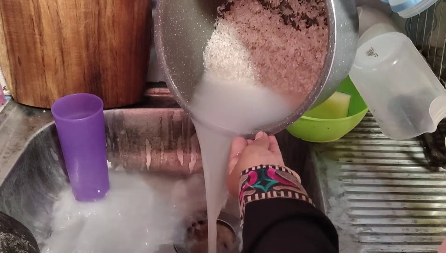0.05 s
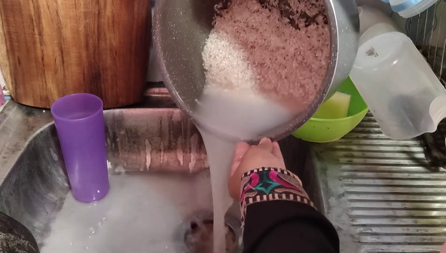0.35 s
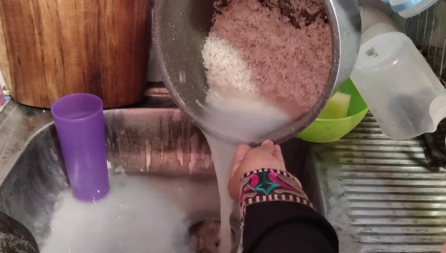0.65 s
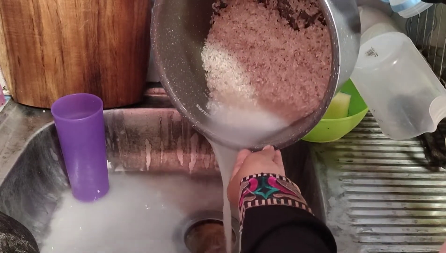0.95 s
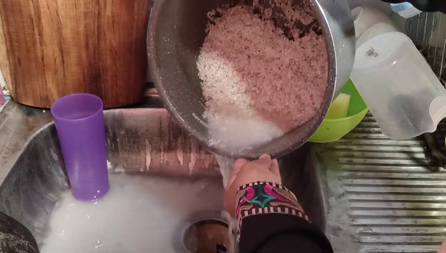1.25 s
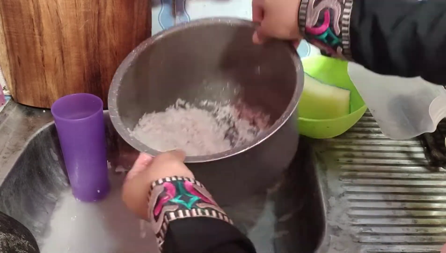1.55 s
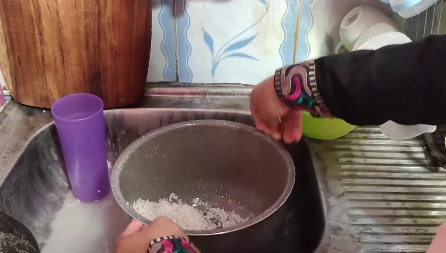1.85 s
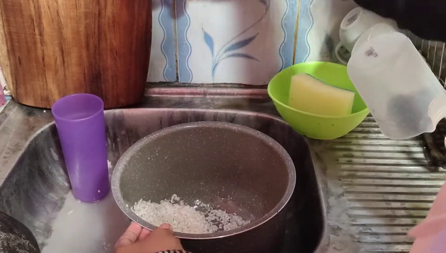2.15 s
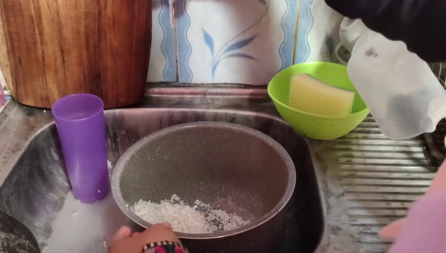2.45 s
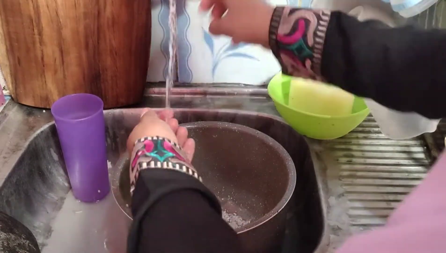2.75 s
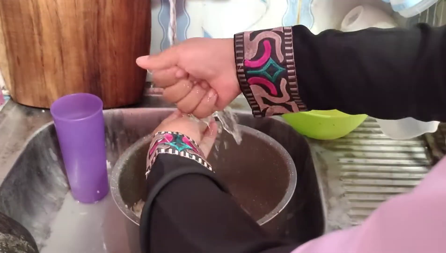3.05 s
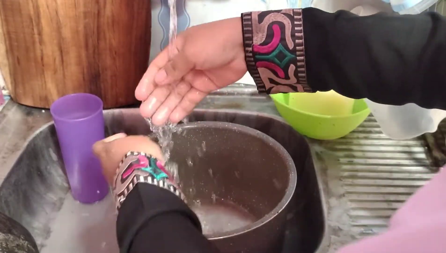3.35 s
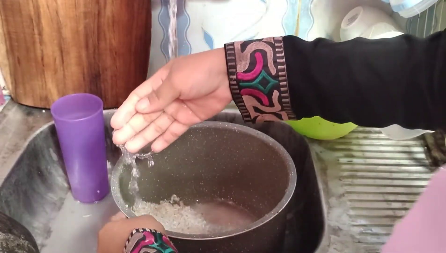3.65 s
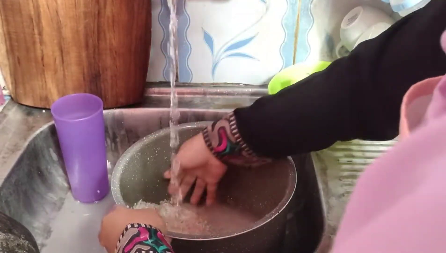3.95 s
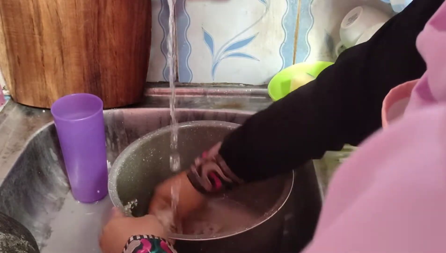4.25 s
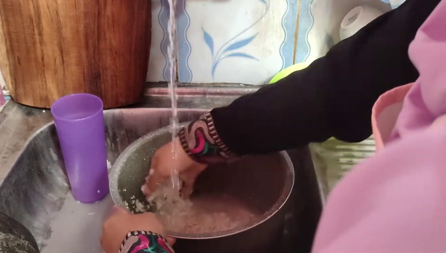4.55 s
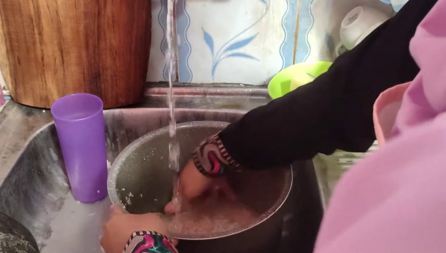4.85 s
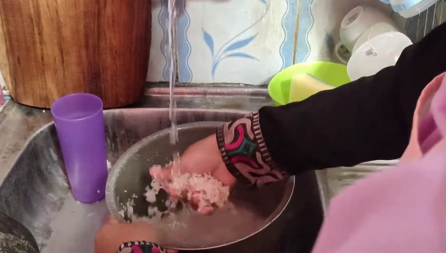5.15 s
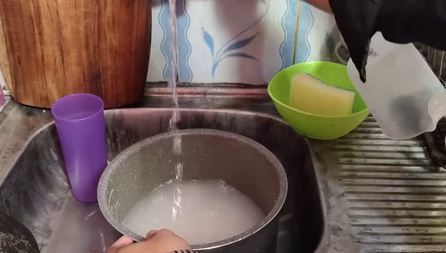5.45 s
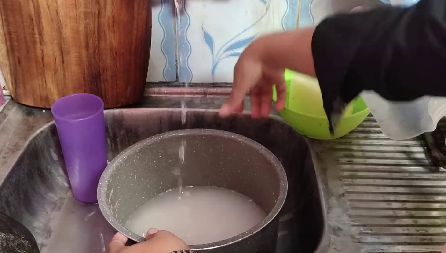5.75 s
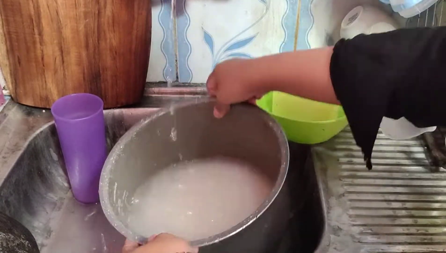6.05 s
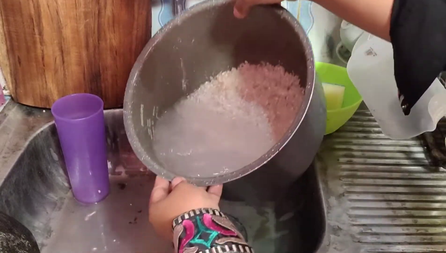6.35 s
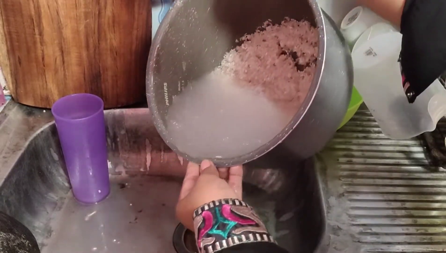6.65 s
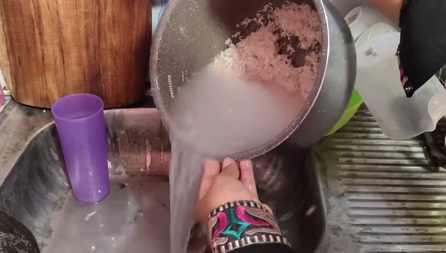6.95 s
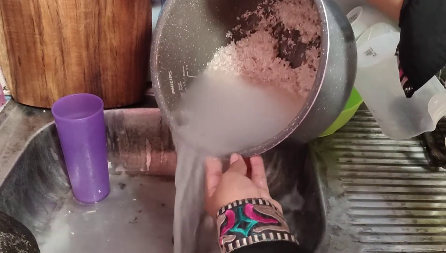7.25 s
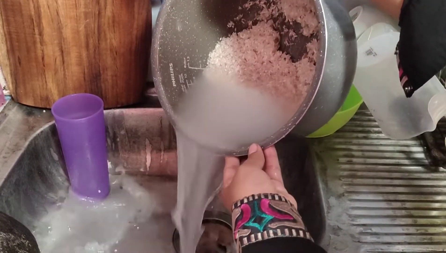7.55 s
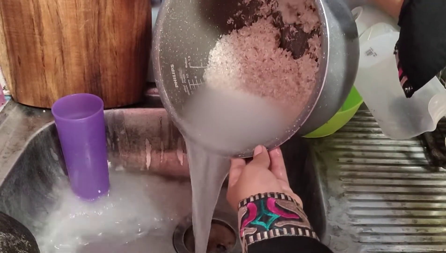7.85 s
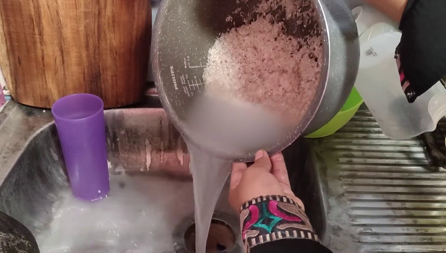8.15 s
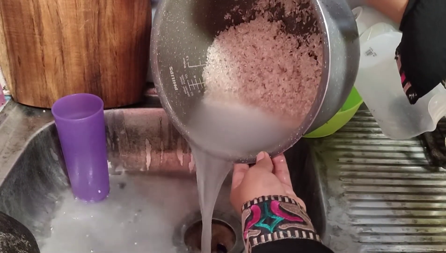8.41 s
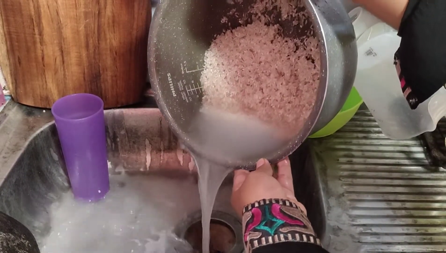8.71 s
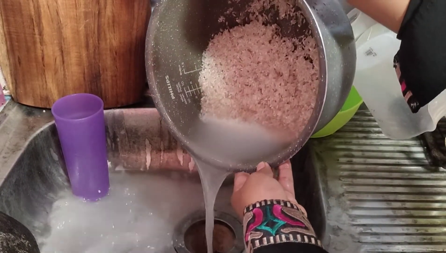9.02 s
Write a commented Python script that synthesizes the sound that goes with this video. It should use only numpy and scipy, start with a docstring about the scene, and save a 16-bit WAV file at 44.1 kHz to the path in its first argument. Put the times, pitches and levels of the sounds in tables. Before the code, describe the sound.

Water splashes and gurgles in a kitchen sink as rice is rinsed, with a metal pot thumping and a tap squeaking open.

```python
"""Rinsing rice in a metal pot

Cloudy water pours into a steel sink in a small kitchen, and the pot is set down with a clatter.
The tap squeaks open; its stream sprays, drums and traps ringing bubbles as a hand swishes the rice.
The pot fills, scrapes out of the sink with a ring of metal, and is drained again."""
import sys
import numpy as np
from scipy import signal
from scipy.fft import rfft, irfft, next_fast_len
from scipy.io import wavfile
from scipy.ndimage import uniform_filter1d

SR = 44100
rng = np.random.default_rng(int(sys.argv[2]) if len(sys.argv) > 2 else 0)


def wav_record(signal):
    """Record a signal, one row per channel, as 16-bit PCM in the file named by sys.argv[1]."""
    frames = np.transpose(np.atleast_2d(signal))
    bounded = np.clip(frames, -1, 1)
    # unit amplitude maps onto the largest positive 16-bit level
    quanta = np.round(bounded * 32767).astype(np.int16)
    wavfile.write(sys.argv[1], SR, quanta)


N = 404838
TIME = np.arange(N) / SR
TOP_HZ = 15700


# Cloudy water running over the rim. Each row: time in seconds, flow in dB.
FIRST_POUR = [(0.03, -43.5), (0.75, -45.5), (0.95, -51), (1.25, -61), (1.42, -55.5)]
SECOND_POUR = [(7.0, -53), (7.35, -38.5), (7.46, -46), (7.58, -35.5), (7.95, -46.5), (8.2, -47),
               (8.46, -45.5), (8.7, -54), (8.8, -46), (8.95, -57.5), (9.18, -58)]
# Steady streams: the last water draining, then the tap on the palm, the rice and the open pool.
# Each row: start and end in seconds, levels in dB of spray, bubbles, gurgle and drumming, hollow's name.
STREAMS = [(1.48, 2.51, -94, -71, -73, -59, "drain"), (2.763, 3.98, -58.5, -59, -67.5, -67, "hand"),
           (4.128, 5.187, -49.5, -48, -54, -52, "hand"), (5.35, 6.018, -48, -43.5, -41.5, -44.5, "pot")]
# The hand presses the pot against the sink floor. Each row: time in seconds, level in dB.
NUDGES = [(3.35, -52), (4.29, -49), (4.45, -47), (4.56, -52), (4.83, -44), (5.15, -38)]

def water():
    """A pour ends and drains away, the tap runs while the hand stirs, and a second pour follows."""
    spray, bubbles, drumming, gurgles = water_layers()
    in_sink = spray, bubbles, gurgles["drain"], drumming
    out = pour(FIRST_POUR, in_sink, gush_db=1.5) + pour(SECOND_POUR, in_sink, gush_db=13.5)
    for start, end, *levels, hollow in STREAMS:
        layers = spray, bubbles, gurgles[hollow], drumming
        stream = sum(gain_of(db) * layer for db, layer in zip(levels, layers))
        out += running(start, end, fade_in_s=0.078, fade_out_s=0.34) * stream
    nudges = drumming * sum(gain_of(db) * hump(middle, length=0.088) for middle, db in NUDGES)
    return out + sloshes(spray, bubbles) + nudges


# How spray, bubbles, gurgle and drumming follow a pour.
# Each row: level in dB at the usual flow, dB gained for each extra dB of flow.
POUR_LAYERS = [(-49.5, 0.8), (-48, 0.63), (-54.5, 0.55), (-53, 0.2)]

def pour(flow, layers, gush_db, gush_s=0.69, usual_flow_db=-46.5):
    """The first gush hits bare steel, so it gurgles and drums louder until a pool cushions it."""
    times, flow_db = np.transpose(flow)
    excess_db = np.interp(TIME, times, flow_db) - usual_flow_db
    gush = gush_db * np.exp(-np.maximum(TIME - times[0], 0) / gush_s)
    sound = sum(gain_of(db + slope * excess_db + boost) * layer
                for (db, slope), boost, layer in zip(POUR_LAYERS, (0, 0, gush, gush), layers))
    return running(times[0], times[-1], fade_in_s=0.045, fade_out_s=0.75) * sound


# The tone of the spray. Each row: frequency in Hz, level in dB.
SPRAY_TONE = [(500, 11), (1500, -10), (3300, -1), (4500, 1.5), (5700, -1), (7200, 3), (8700, 4.5),
              (10500, 0.5), (12500, -1), (14200, 1), (15300, 1.5)]
# The notes of the sink floor and of three air hollows. Each row: pitch in Hz, width in Hz, level in dB.
SINK_NOTES = [(81, 46, -6.5), (113.7, 15.6, 1), (135.2, 4.8, 4), (174, 136, -11.5)]
DRAIN_NOTES = [(187, 11, -4), (278, 17.7, 22.5), (404, 76, -53), (474, 81, -34), (670, 440, -4)]
HAND_NOTES = [(252, 52, 6.5), (406, 79, 6), (522, 120, 3.5), (840, 320, -3)]
POT_AIR_NOTES = [(431.4, 13, 8), (619, 35, -3), (760, 130, -14), (1124, 65, -8), (2325, 17, -7),
                 (2800, 54, -17)]

def water_layers():
    """Running water throws spray, traps bubbles, drums on the sink and gurgles in hollows."""
    spray = evened(coloured(splashes(450, 15400, depth=0.65, bands=5), SPRAY_TONE))
    spray *= spatter(per_s=52, fade_s=0.01, depth=1.0)
    bubbles = bubbling()
    lumps = impacts(per_s=500, spread_db=-3.0)  # the stream falls in lumps
    drumming = resonate(impacts(per_s=540, spread_db=1.0), SINK_NOTES)
    drumming = evened(filtered(drumming, lambda hz: 1 / (1 + (hz / 320) ** 4)))
    gurgles = {name: evened(filtered(resonate(lumps, notes), lambda hz: hz ** 2 / (hz ** 2 + 170 ** 2)))
               for name, notes in (("drain", DRAIN_NOTES), ("hand", HAND_NOTES), ("pot", POT_AIR_NOTES))}
    wobble = unsteady(per_s=14, depth_db=1.0)
    return spray * wobble, bubbles * wobble, drumming * unsteady(per_s=15, depth_db=2.0), gurgles


def splashes(low_hz, high_hz, depth, bands):
    """Drops spatter, and each band of pitch flares at its own moments."""
    out = np.zeros(N)
    edges = np.geomspace(low_hz, high_hz, bands + 1)
    for band in zip(edges, edges[1:]):
        band_filter = signal.butter(2, band, "bandpass", fs=SR, output="sos")
        drops = signal.sosfilt(band_filter, impacts(per_s=7000, spread_db=1.0))
        out += drops * spatter(per_s=15, fade_s=0.014, depth=depth)
    return out


# The tone of small bubbles. Each row: frequency in Hz, level in dB.
BUBBLE_TONE = [(700, -3.5), (1150, -1.5), (1800, -2), (2600, 0), (3600, 0), (5000, -8.5), (8000, 1)]

def bubbling():
    """A fizzing wash lies under many short bubbles and a few that ring longer."""
    wash = evened(coloured(splashes(744, 5100, depth=11.0, bands=6), BUBBLE_TONE))
    short = froth(per_s=42, cycles=20, spread_db=1.5, glide=0.11, pitches=44)
    longer = froth(per_s=2.5, cycles=40, spread_db=3, glide=0.052, pitches=24)
    return gain_of(-8.5) * short + gain_of(-4.5) * wash + gain_of(-14.5) * longer


def froth(per_s, cycles, spread_db, glide, pitches, tries=600):
    """Small bubbles swarm, about per_s a second at each pitch: many faint, a few strong."""
    out = np.zeros(N)
    for hz in np.geomspace(720, 8000, pitches):
        ring = bubble(hz, cycles / hz + 0.004, glide, onset_s=0.0005)
        ring = gain_of(level_at(BUBBLE_TONE, hz)) * unit_energy(ring)
        for place, size, chance in rng.random((tries, 3)):
            if chance < per_s * TIME[-1] / tries:
                add(out, place * TIME[-1], ring * gain_of(-spread_db * np.log(size + 0.03)))
    return evened(out)


def bubble(hz, t60, glide, onset_s):
    """A bubble's note rises as it nears the surface; t60 is the seconds it takes to fade by 60 dB."""
    t = np.arange(0, t60, 1 / SR)
    note = np.sin(2 * np.pi * hz * (t + glide * t ** 2 / (2 * t60)))
    return note * gain_of(-60 * t / t60) * (1 - np.exp(-t / onset_s))


# Waves in the pot. Each row: middle in seconds, level in dB, length in seconds, first and last Hz.
SLOSHES = [(4.349, -50, 0.11, 850, 425), (4.927, -50.5, 0.043, 520, 726), (5.051, -46, 0.2, 802, 1054),
           (5.677, -47.5, 0.12, 615, 597)]

def sloshes(spray, bubbles, width_hz=630):
    """Each wave throws spray and bubbles around a hollow whose pitch glides as it opens or closes."""
    out = np.zeros(N)
    keep = np.exp(-np.pi * width_hz / SR)
    churn = evened(signal.lfilter([1], [1, -2 * keep, keep ** 2], rng.standard_normal(N)))
    for middle, db, length, first_hz, last_hz in SLOSHES:
        hz = np.interp(TIME, [middle - length / 2, middle + length / 2], [first_hz, last_hz])
        gurgle = np.sqrt(2) * churn * np.sin(2 * np.pi * np.cumsum(hz) / SR)
        out += gain_of(db) * hump(middle, length) * (bubbles + gain_of(-1) * spray + gain_of(3) * gurgle)
    return out


# Single bubbles, and the drain gulping air. Each row: start in seconds, level in dB, pitch in Hz.
PLOPS = [(.366, -42, 1960), (.479, -34, 1220), (.704, -39, 1210), (.485, -35.5, 453), (.712, -35, 860),
         (2.966, -44.5, 2950), (3.215, -41, 1460), (3.856, -45.5, 2440), (4.141, -31, 1320),
         (4.163, -33.5, 1320), (4.215, -31, 1360), (4.506, -39, 1115), (4.33, -39, 785), (4.35, -32, 600),
         (4.375, -34, 460), (4.726, -37.5, 1310), (4.911, -31, 723), (5.086, -39.5, 1530),
         (5.427, -32.5, 3290), (5.477, -35, 1130), (5.487, -25, 534), (5.512, -28, 1195), (5.643, -28, 604),
         (5.786, -34, 1146), (5.822, -33, 3520), (5.821, -27, 620), (5.847, -13.5, 541), (7.98, -40, 1070),
         (8.044, -38, 2000), (8.28, -41, 2320), (8.456, -42.5, 1300)]
GULPS = [(0.653, -31.5, 268.5), (1.042, -34.5, 263.4), (1.594, -33.5, 276.5), (7.021, -32.5, 197),
         (7.525, -29, 296), (7.559, -32.5, 190), (7.67, -29.5, 272.5), (7.712, -32, 193),
         (7.983, -34.5, 294)]

def plops(note_db=4, splash_db=2, splash_width=0.55, splash_t60=0.02, gulp_t60=0.27):
    """Large bubbles swell into round notes; smaller, quicker ones burst with a splash."""
    out, t = np.zeros(N), np.arange(SR // 10) / SR
    free = [(start, db, hz, 0.023 + 0.056 * (500 / hz) ** 2) for start, db, hz in PLOPS]
    in_drain = [(start, db, hz, gulp_t60) for start, db, hz in GULPS]
    for start, db, hz, t60 in free + in_drain:
        onset_s = 0.12 * t60 * 500 / (hz + 250)
        add(out, start, gain_of(db + note_db) * bubble(hz, t60, glide=0.086, onset_s=onset_s))
        cavity = [(hz, hz * splash_width, 0)]
        burst = evened(resonate(resonate(rng.standard_normal(len(t)), cavity), cavity))
        add(out, start, gain_of(db + splash_db - 60 * t / splash_t60) * burst / (1 + (600 / hz) ** 4))
    return out


# Short hisses and ticks: wet rice rubbing, the pot's sharp crack, a splash of water.
# Each row: start in seconds, level in dB, length in seconds.
HISSES = [(1.422, -43, 0.0085), (1.459, -44, 0.06), (1.58, -38.5, 0.035), (1.655, -47.5, 0.017),
          (2.004, -39.5, .022), (2.235, -52.5, 0.045), (2.575, -47.5, 0.11), (2.811, -46.5, 0.02),
          (3.174, -44, 0.03), (3.281, -51.5, 0.051), (4.035, -47, .05), (4.177, -43.5, 0.1),
          (4.461, -37, 0.04), (4.516, -42.5, 0.044), (4.677, -33, .045), (4.758, -39.5, 0.062),
          (4.938, -31.5, 0.023), (5.24, -39.5, 0.053), (5.648, -37.5, 0.046), (6.016, -38, 0.009),
          (6.139, -42, 0.01), (6.316, -33, 0.0078), (6.327, -51, 0.06), (7.299, -39.5, 0.063)]
# Their tone. Each row: frequency in Hz, level in dB.
HISS_TONE = [(600, -25), (2200, -7.5), (3800, 3.5), (5600, -0.5), (7500, 6), (9000, 6.5), (11500, 0.5),
             (14000, 2), (15200, 1)]

def hisses():
    """Tiny ticks, as of wet grains colliding, blur into a hiss; long ones start and end more gently."""
    loudness, t = np.zeros(N), np.arange(SR // 2) / SR
    for start, db, length in HISSES:
        rise = np.minimum(t / (0.21 * length), 1)
        fade_db = 60 * np.maximum(t - length, 0) / (3.3 * length)
        add(loudness, start, rise * gain_of(db - fade_db))
    ticks = evened(coloured(impacts(per_s=15000, spread_db=3), HISS_TONE))
    return loudness * ticks * spatter(per_s=120, fade_s=0.0051, depth=0.31)


# Blows on the sink from the pot and a gush out of it. Each row: start in seconds, level in dB,
# hardness in Hz (higher is brighter), scrape in seconds, boom pitch in Hz, boom level in dB.
KNOCKS = [(1.687, -17, 860, 0.0021, 127, -25), (1.696, -18, 684, 0.0026, 128, -23),
          (1.753, -37, 2000, 0.002, 133, -45), (1.76, -16.5, 596, 0.019, 128.2, -22.5),
          (1.81, -25, 844, 0.0063, 121, -24), (2.005, -26.5, 910, 0.026, 108.9, -18),
          (2.015, -20.5, 560, 0.044, 106.4, -19), (5.318, -21.5, 380, 0.013, 78, -25),
          (5.355, -24.5, 372, 0.016, 105, -26.5), (5.428, -44, 352, 0.011, 133, -29.5),
          (5.931, -26, 495, 0.029, 130, -27.5), (6.016, -14.5, 840, 0.028, 132.3, -13),
          (6.045, -20.5, 615, 0.088, 131.4, -38), (6.147, -27.5, 547, 0.031, 127.2, -24.5),
          (6.32, -28.5, 815, 0.029, 129, -48), (6.353, -25.5, 427, 0.0043, 129, -52),
          (6.396, -19.5, 566, 0.044, 102.8, -28), (6.454, -26, 540, 0.032, 127.5, -34),
          (6.986, -44.5, 350, 0.019, 77, -38.5)]
# The tilted pot settles lightly against the edge. Each row: start in seconds, level in dB.
BUMPS = [(6.545, -31.5), (6.586, -38), (6.678, -39.5), (6.726, -41.5), (6.803, -41.5)]

def knocks(boom_t60=0.37):
    """The pot strikes the sink, and the sink floor booms at its lowest note under the load."""
    out, t = np.zeros(N), np.arange(SR * 3 // 5) / SR
    bumps = [(start, db, 605, 0.031, 129.8, db - 4.5) for start, db in BUMPS]  # laid out like KNOCKS
    for start, db, hard_hz, scrape_s, boom_hz, boom_db in KNOCKS + bumps:
        add(out, start, gain_of(db) * clang(t, hard_hz, scrape_s) * np.sqrt((scrape_s + 0.021) * SR))
        swell = 1 - np.exp(-t / (0.19 * scrape_s))
        fade_db = 60 * np.maximum(t - scrape_s, 0) / boom_t60
        add(out, start, gain_of(boom_db - fade_db) * swell * np.sin(2 * np.pi * boom_hz * t))
    return out


# The notes of pot and sink together. Each row: pitch in Hz, level in dB, seconds to fade by 60 dB.
METAL_NOTES = [(205, -7, 0.77), (265.3, 13, 0.28), (291.4, 5.5, 0.41), (368, -16.5, 0.99), (400, 3, 0.21),
               (426.7, 10.5, 0.22), (476, -2, 0.24), (557, 4, 0.22), (625, -12, 0.47), (730, -8, 0.31),
               (764, 4, 0.17), (845, -14, 0.24), (969, -30, 0.41), (980, -6, 0.18), (1210, -8, .3),
               (1500, -20, 0.16), (1600, 10, 0.087), (1890, -9, .28), (2160, -11, 0.18), (2800, -14, .2)]
# The tone of their clatter. Each row: frequency in Hz, level in dB.
CLATTER_TONE = [(40, -65), (90, 4.5), (170, 1.5), (270, 5.5), (500, 2.5), (1100, -2), (1800, -2.5),
                (3000, -0.5), (5500, -4), (9000, 5.5), (15000, -8)]

def clang(t, hard_hz, scrape_s, clack_t60=0.046, sheet_t60=0.23, slips_per_s=900):
    """The pot hits and judders along the steel, and both clatter and ring."""
    slips, clack, sheet = rng.standard_normal((3, len(t)))
    force = 0.22 * slips * (rng.random(len(t)) < slips_per_s / SR) / (1 + (t / scrape_s) ** 10)
    force[0] = np.exp(-scrape_s / 0.034)  # a glancing blow has little first impact
    notes = sum(gain_of(db - 60 * t / t60) * np.sin(2 * np.pi * (hz * t + rng.random()))
                for hz, db, t60 in METAL_NOTES)
    # thin steel has countless more notes, so close that they blur into noise
    clack = coloured(clack * gain_of(-60 * t / clack_t60), CLATTER_TONE)
    sheet = coloured(sheet * gain_of(-60 * t / sheet_t60), CLATTER_TONE)
    force = signal.lfilter(*signal.butter(2, hard_hz, fs=SR), force)
    clack, sheet, notes = (unit_energy(signal.fftconvolve(force, part)[:len(t)])
                           for part in (clack, sheet, notes))
    ring_db = -0.5 - 4 * np.log2(hard_hz / 600)  # harder blows clatter more and ring less
    return unit_energy(clack + gain_of(ring_db) * (notes + gain_of(-1) * sheet))


# The tap handle turning, one list per squeak. Each row: time in seconds, pitch in Hz, level in dB.
SQUEAKS = [
    [(2.351, 1720, -58), (2.357, 1740, -42), (2.364, 1950, -55), (2.372, 2240, -40), (2.388, 2227, -46),
     (2.403, 2186, -43.5), (2.414, 1780, -47), (2.425, 1750, -55), (2.46, 1780, -68)],
    [(2.63, 1660, -61), (2.637, 1780, -46), (2.648, 1810, -60), (2.658, 1765, -40.5), (2.672, 2190, -46.5),
     (2.684, 1820, -46), (2.7, 1730, -55)],
    [(2.63, 834, -43.5), (2.665, 838, -58), (2.697, 899, -52), (2.712, 822, -40.5), (2.723, 803, -39),
     (2.738, 830, -59)],
]

def tap_squeaks(jitter=0.022, rasp=0.43, friction_db=-14):
    """The tap's spindle sticks and slips at an unsteady rate and strength."""
    out = np.zeros(N)
    for rows in SQUEAKS:
        times, hz, db = np.transpose(rows)
        t = np.arange(times[0], times[-1], 1 / SR)
        waver, grip = evened(uniform_filter1d(rng.standard_normal((2, SR // 2)), size=30))[:, :len(t)]
        pitch = np.interp(t, times, hz) * (1 + jitter * waver)
        phase = 2 * np.pi * np.cumsum(pitch) / SR
        overtones = sum(gain_of(-9 - 2 * np.log2(k / 2)) * np.sin(k * phase) * (k * pitch < TOP_HZ)
                        for k in range(2, 19))
        tone = np.sin(phase) + overtones + gain_of(friction_db) * rng.standard_normal(len(t))
        loudness = gain_of(np.interp(t, times, db)) * signal.windows.tukey(len(t), 0.06)
        add(out, times[0], loudness * evened(tone * (1 + rasp * grip)))
    return out


# The tone of the sink and kitchen echoes, weak in the bass. Each row: frequency in Hz, level in dB.
ECHO_TONE = [(60, -54), (125, -33), (250, -7.5), (500, -5), (1000, 2.5), (2000, 1.5), (15000, 3.5)]

def sink_echoes(x, near_t60=0.014, room_t60=0.24, room_db=-15):
    """Echoes off the sink walls; every drop lands somewhere new, so their pattern never repeats."""
    frame, hop = 192, 48  # samples
    spectra = signal.stft(coloured(x, ECHO_TONE), SR, nperseg=frame, noverlap=frame - hop)[2]
    power = 0
    for t60, db in (near_t60, 0), (room_t60, room_db):
        keep = gain_of(-60 * hop / SR / t60) ** 2
        power += gain_of(db) ** 2 * signal.lfilter([0, 1 - keep], [1, -keep], abs(spectra) ** 2)
    phases = np.exp(2j * np.pi * rng.random(spectra.shape))
    echo = signal.istft(2 * np.sqrt(power) * phases, SR, nperseg=frame, noverlap=frame - hop)[1][:N]
    return signal.lfilter(*signal.butter(2, 170, "highpass", fs=SR), echo)


def kitchen_echoes(x, t60):
    """Tiled walls add a short, dense tail."""
    t = np.arange(SR // 3) / SR
    tail = rng.standard_normal(len(t)) * gain_of(-60 * t / t60) * (t > 0.001)
    return signal.oaconvolve(coloured(x, ECHO_TONE), unit_energy(tail))[:N]


# The kitchen's background noise. Each row: frequency in Hz, level in dB.
ROOM_TONE = [(20, -10), (60, -31), (110, -5), (190, -9.5), (300, -1), (700, -9.5), (1500, -16),
             (3000, -17.5), (5700, -25), (8000, -19.5), (15000, -27)]

def room_noise():
    """A faint, steady hush fills the room."""
    return gain_of(-56.5) * evened(coloured(rng.standard_normal(N), ROOM_TONE))


def impacts(per_s, spread_db):
    """Random clicks of uneven size."""
    size = gain_of(spread_db * np.minimum(rng.exponential(1, N), 4))
    return size * rng.choice([-1, 1], N) * (rng.random(N) < per_s / SR)


def spatter(per_s, fade_s, depth):
    """A volume that jumps with each small splash and then sinks back."""
    jumps = rng.exponential(1, N) * (rng.random(N) < per_s / SR)
    power = signal.lfilter([1], [1, -np.exp(-1 / (fade_s * SR))], jumps)
    return evened(np.sqrt(1 + depth * power / power.mean()))


def unsteady(per_s, depth_db):
    """A volume that wanders, as a falling stream wobbles."""
    steps = rng.standard_normal(1000)
    return gain_of(depth_db * np.interp(TIME * per_s, np.arange(len(steps)), steps))


def running(start, end, fade_in_s, fade_out_s):
    """A volume that is fully up from start to end."""
    return np.interp(TIME, [start - fade_in_s, start, end, end + fade_out_s], [0, 1, 1, 0])


def hump(middle, length):
    """A smooth swell and fall."""
    return np.exp(-np.minimum((2 * (TIME - middle) / length) ** 2, 20))


def resonate(x, notes):
    """Makes a sound ring at the given notes."""
    return sum((-1) ** k * gain_of(db) * signal.lfilter(*signal.iirpeak(hz, hz / width, SR), x)
               for k, (hz, width, db) in enumerate(notes))


def coloured(x, tone):
    """Shapes bass and treble by a tone table."""
    return filtered(x, lambda hz: gain_of(level_at(tone, hz)))


def filtered(x, response):
    """Scales each frequency by response(hz)."""
    size = next_fast_len(len(x) + 2048)
    return irfft(rfft(x, size) * response(np.fft.rfftfreq(size, 1 / SR)), size)[:len(x)]


def level_at(tone, hz):
    """Reads dB between the rows of a tone table."""
    row_hz, db = np.transpose(tone)
    return np.interp(np.log(hz + 1), np.log(row_hz + 1), db)


def gain_of(db):
    """Turns decibels into a multiplier."""
    return 10 ** (np.asarray(db) / 20)


def evened(x):
    """Scales to an average power of 1."""
    return x / np.sqrt(np.mean(x ** 2) + 1e-20)


def unit_energy(x):
    """Scales to a total energy of 1."""
    return x / np.linalg.norm(x)


def add(mix, start, sound):
    """Mixes a sound in at start seconds."""
    part = mix[max(round(start * SR), 0):][:len(sound)]
    part += sound[:len(part)]


def scene():
    """Everything sounds in the sink; echoes spread the treble while the bass stays in the middle."""
    in_sink = water() + hisses() + knocks() + plops()
    squeaks = tap_squeaks()
    direct = in_sink + squeaks + room_noise()
    mid = direct + gain_of(-12.5) * kitchen_echoes(direct, t60=0.21)
    side = gain_of(-2.5) * sink_echoes(direct - squeaks)
    side += gain_of(-3.5) * kitchen_echoes(squeaks, t60=0.064)
    return np.array([mid + side, mid - side])


# The microphone's lean to one side. Each row: frequency in Hz, dB by which left is louder than right.
MIC_LEAN = [(100, 1), (500, -0.5), (1200, 1.5), (2400, 0.7), (4400, 3), (8100, 1), (11000, -1.5),
            (14500, 9.5)]

def record(dry):
    """The microphone's two sides differ in tone and lose the deepest bass and highest treble."""
    sides = np.array([filtered(x, lambda hz: gain_of(sign * level_at(MIC_LEAN, hz) / 2))
                      for x, sign in zip(dry, (1, -1))])
    sides = signal.lfilter(*signal.butter(2, 48, "highpass", fs=SR), sides)
    sides = sides / (1 + (sides / 0.8) ** 6) ** (1 / 6)  # rounds off the loudest peaks
    treble_cut = signal.firwin(511, TOP_HZ, window=("kaiser", 9), fs=SR)
    return signal.oaconvolve(sides, treble_cut[None], "same")


dry = scene()
out = record(dry)
wav_record(out)
```